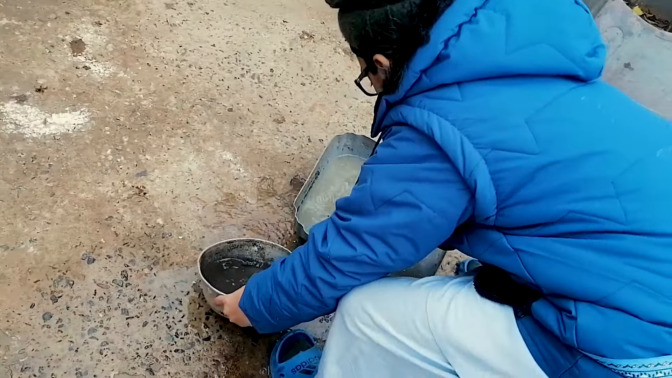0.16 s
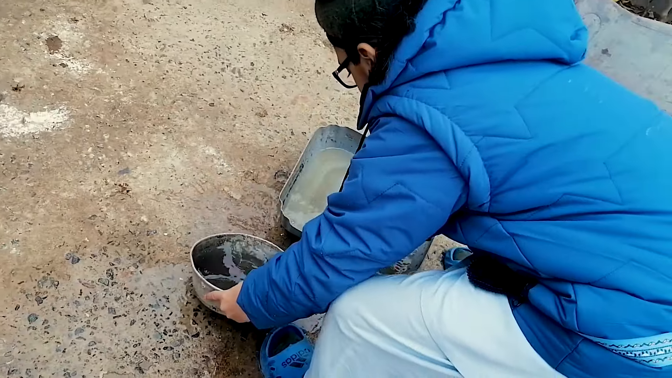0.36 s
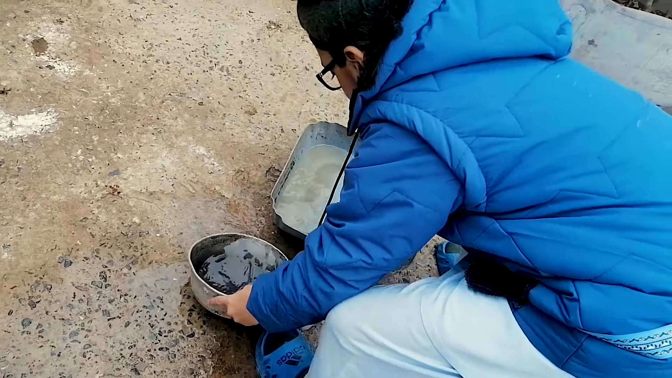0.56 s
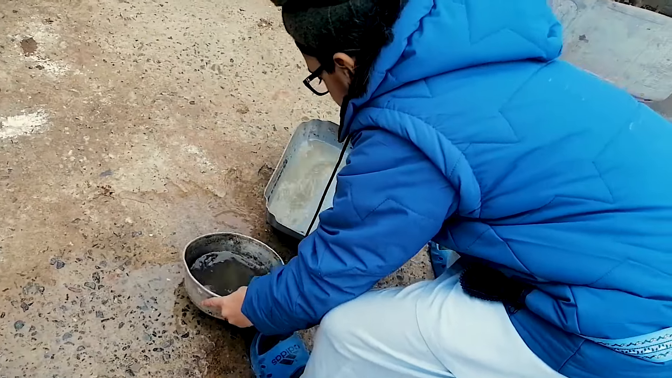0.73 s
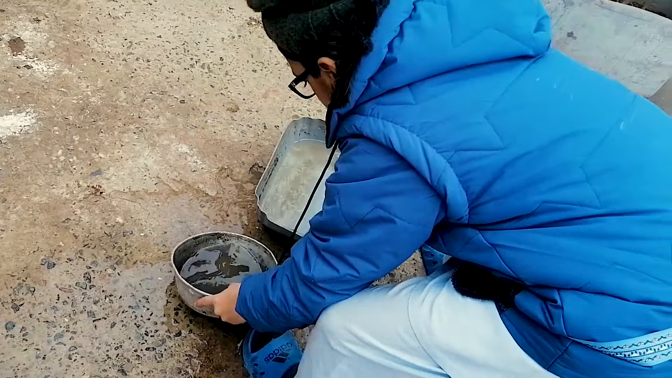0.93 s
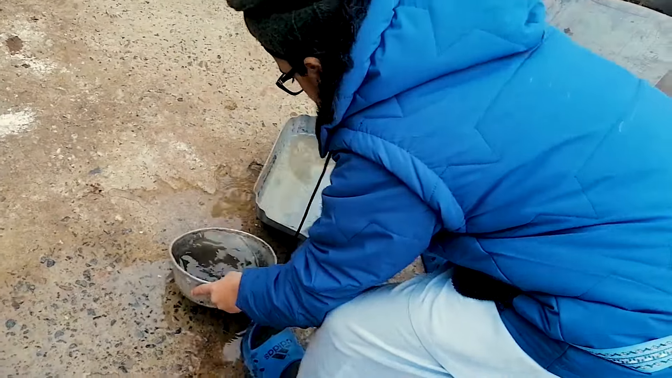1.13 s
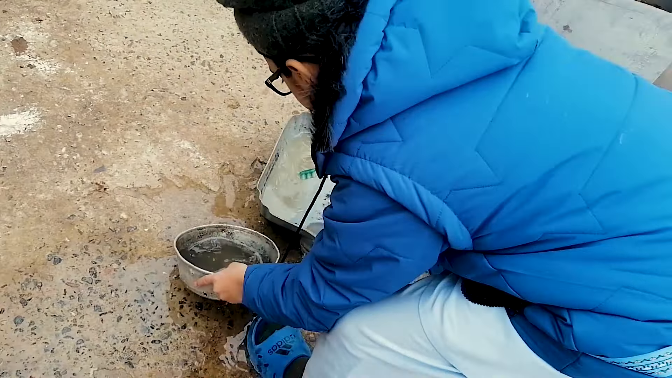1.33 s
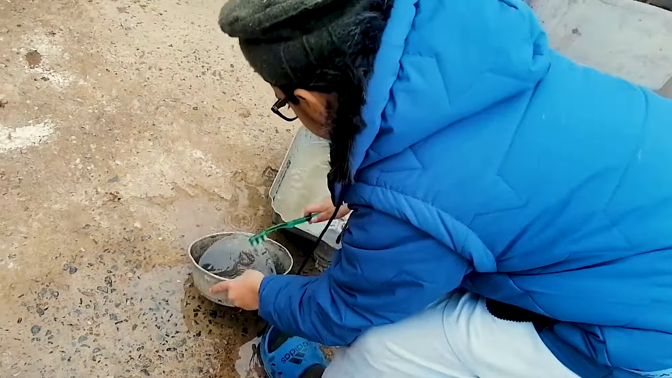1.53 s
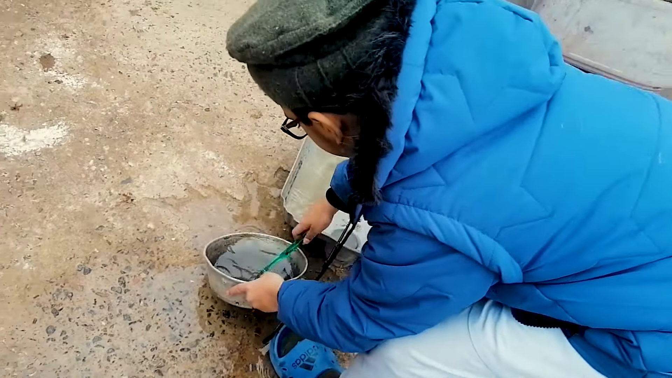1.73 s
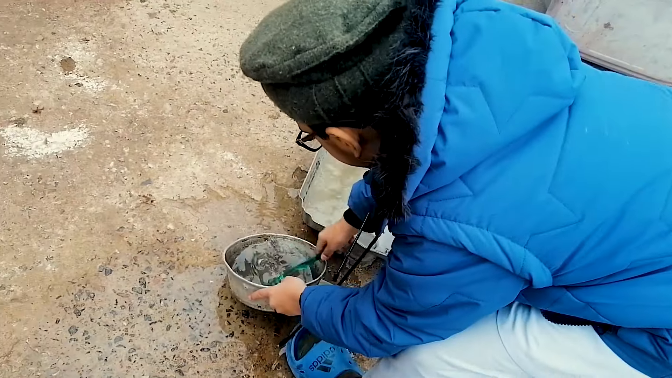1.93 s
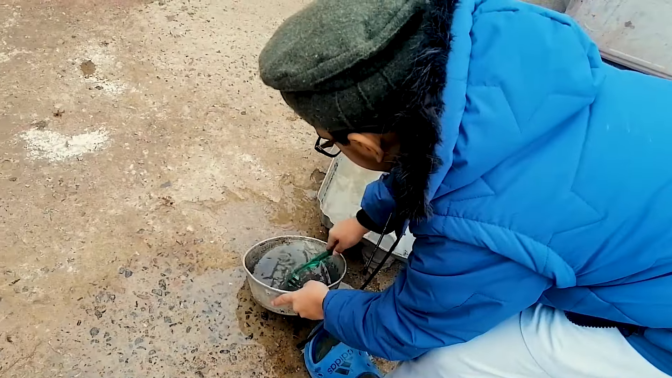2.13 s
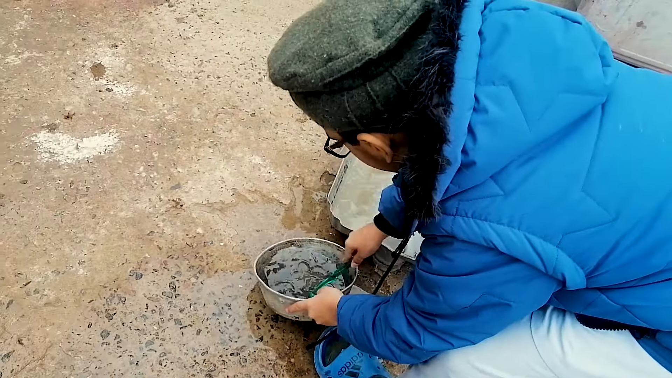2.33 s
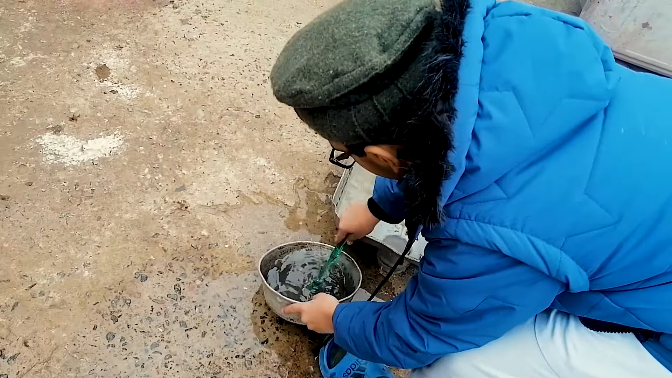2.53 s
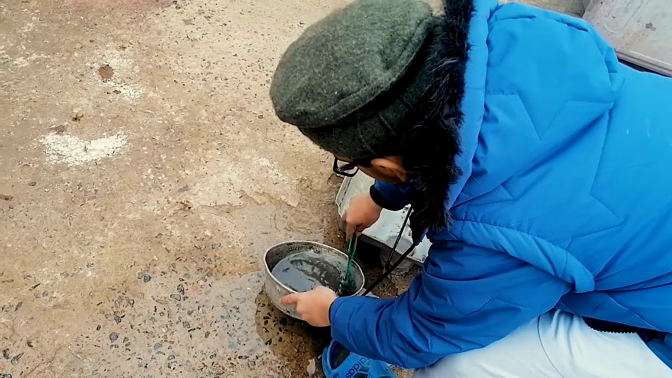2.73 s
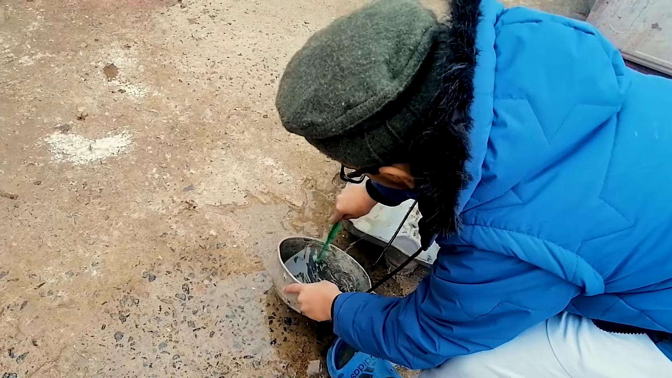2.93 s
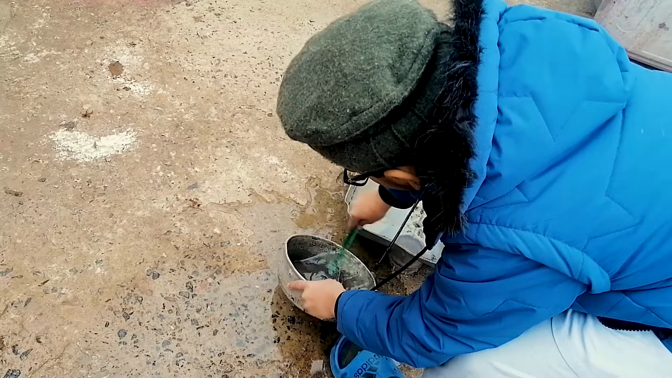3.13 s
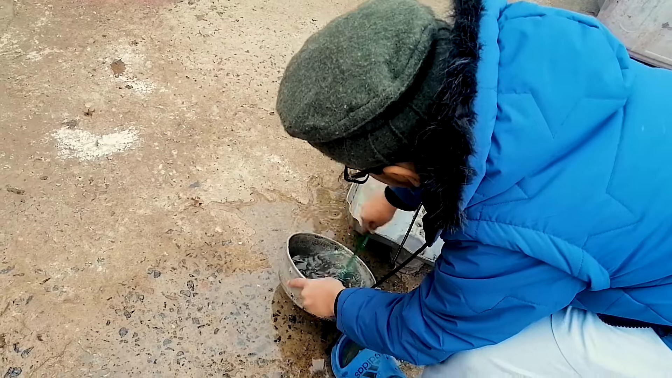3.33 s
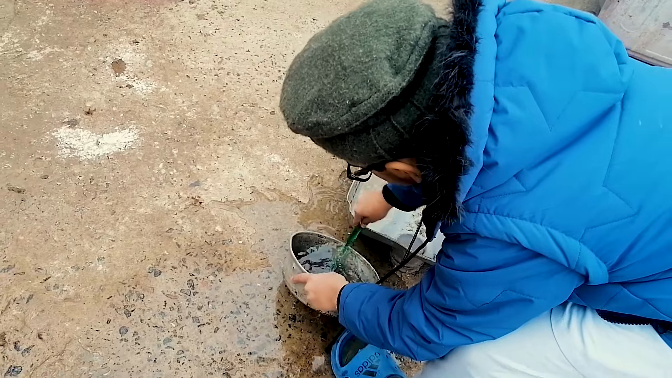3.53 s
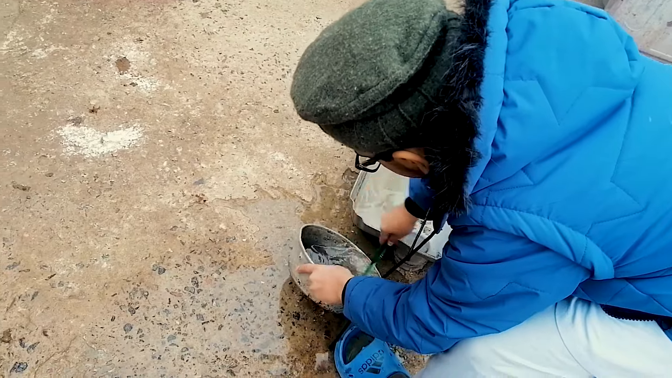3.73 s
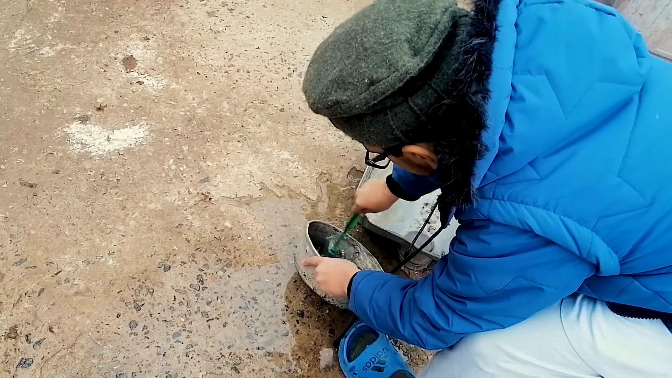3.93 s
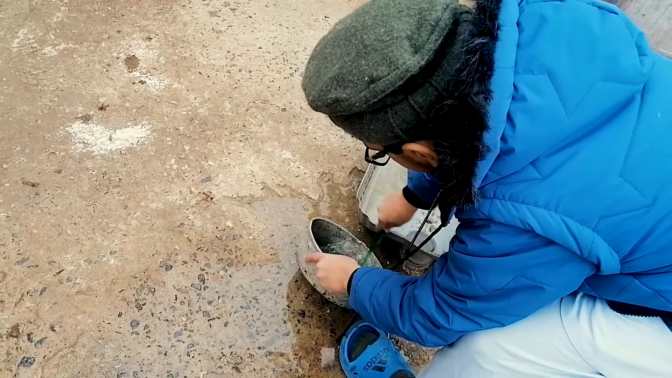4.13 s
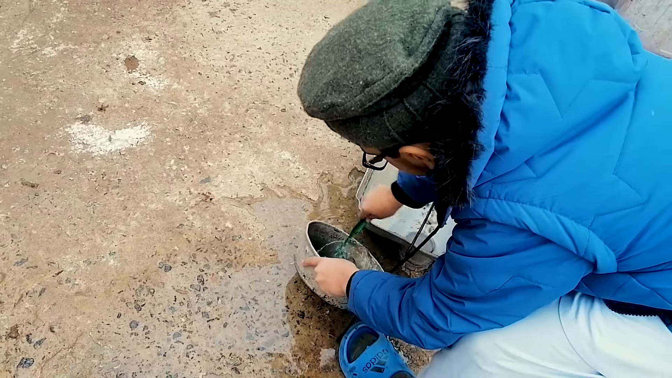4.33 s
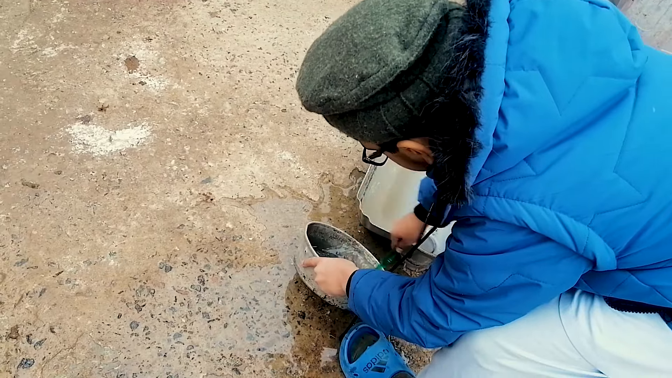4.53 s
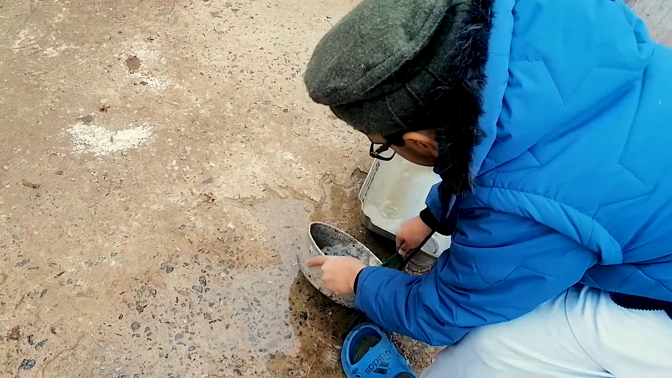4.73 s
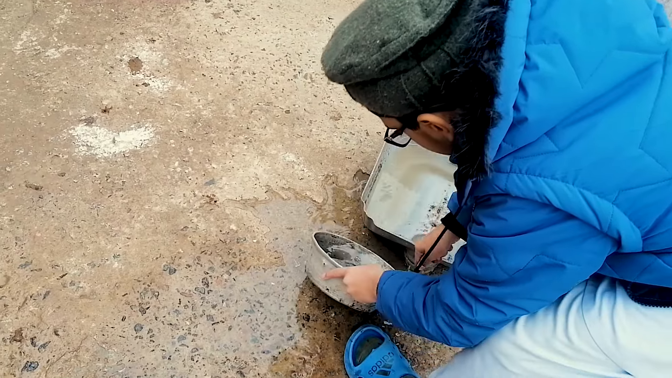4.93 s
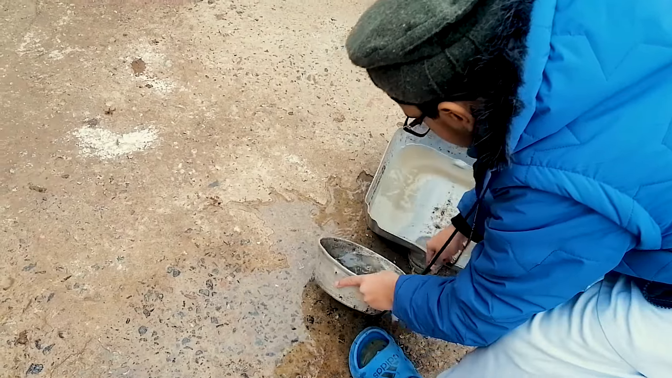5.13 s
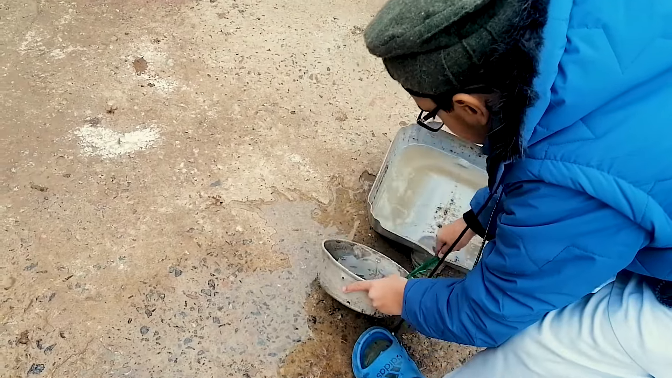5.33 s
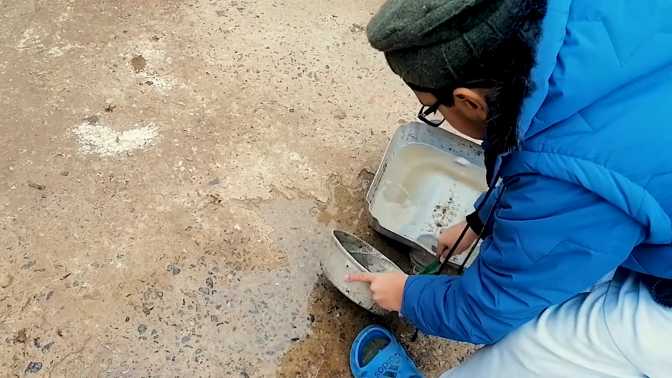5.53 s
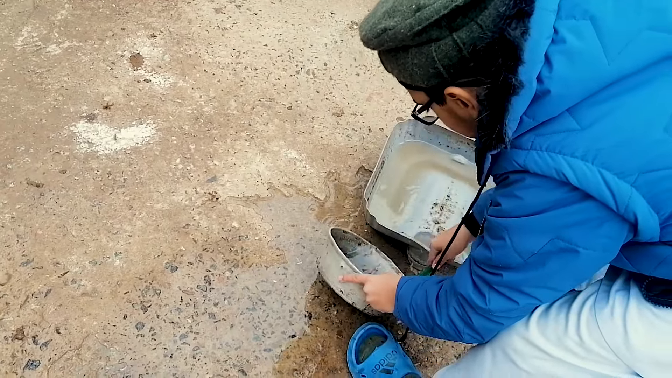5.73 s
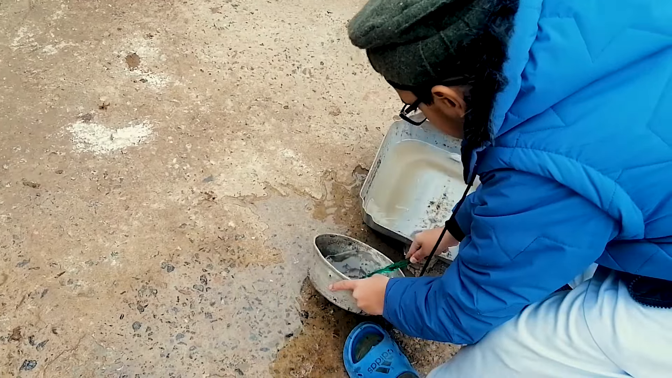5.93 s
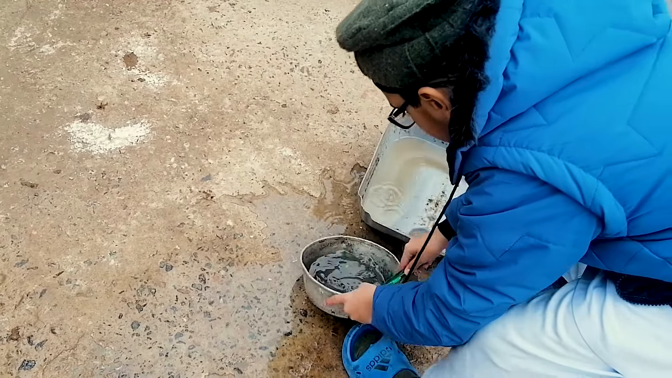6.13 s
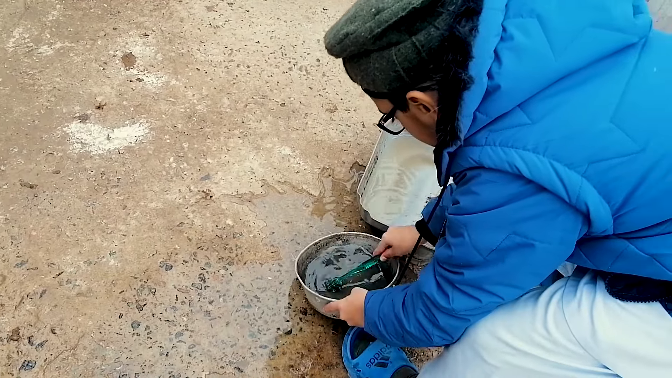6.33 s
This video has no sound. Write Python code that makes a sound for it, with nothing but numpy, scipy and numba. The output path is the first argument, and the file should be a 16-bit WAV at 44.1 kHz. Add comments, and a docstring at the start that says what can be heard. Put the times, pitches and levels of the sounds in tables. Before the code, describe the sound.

A metal bowl shifts and grinds briefly, pauses while a bird whistles, then is scrubbed with a stiff little brush. Strokes are quick, dry-edged and crisp, some hissy and thin, others ringing the damped bowl around a hollow mid pitch. Small ticks and knocks interrupt. Close, nearly dry open-air sound with quiet distant rumble, light wind thuds and faint hum.

```python
"""Scrubbing a gritty steel bowl

A small stiff brush scrubs a wet, gritty steel bowl held on concrete, heard at two microphone ports.
Strokes land, drag and lift: bristles flick over grit (shaped noise) and ring the hand-damped bowl (modes).
The brush head and the ground knock the bowl now and then, and its base grinds on the ground.
A bird chirps in gliding whistles over far rumble, thuds, hiss and hum; the right port resonates in the treble."""
import sys
import numpy as np
from scipy import signal
from scipy.fft import rfft, irfft
from scipy.io import wavfile
from scipy.ndimage import uniform_filter1d, minimum_filter1d
from numba import njit

SR = 44100
rng = np.random.default_rng(int(sys.argv[2]) if len(sys.argv) > 2 else 0)


def persist_wave(psi):
    """Save psi, clipped to +-1, as 16-bit WAV."""
    counts = np.round(np.clip(psi, -1, 1) * 32767).astype(np.int16)
    wavfile.write(sys.argv[1], SR, np.atleast_2d(counts).T)


N = 280678

# Brush strokes. Each row: start in seconds, landing in seconds, drag in seconds, swell over the drag in dB,
# then at the end of the drag bristle force, wall force and body force in dB,
# top treble in dB, favoured wall pitch in Hz, favoured body pitch in Hz.
STROKES = [ (0.0, 0.0051, 0.004, -10, -29, -33.5, -0.5, -3.5, 1660, 767),
           (.024, 0.0029, .055, -5.5, -43.5, -45.5, -22.5, -4, 1650, 864),
           (.07, 0.0042, 0.065, -2.5, -40.5, -44, -30.5, -1, 1850, 670),
           (0.15, 0.0044, 0.02, -14.5, -51.5, -48, -32.5, -14, 1390, 810),
           (.192, 0.0038, 0.0069, -8.5, -34, -49.5, -40, -45.5, 1450, 770),
           (.44, 0.064, .11, 8, -53.5, -74.5, -77, -11, 1404, 780),
           (.62, 0.0039, 0.0081, -5, -49, -63, -68.5, 10.5, 1390, 795),
           (1.574, 0.028, 0.04, -0.5, -38, -43.5, -64, 10.5, 2700, 840),
           (1.775, 0.034, 0.024, 0.5, -28.5, -29.5, -60, -10, 2296, 860),
           (1.95, 0.047, 0.025, 3.5, -48, -56, -51, 0.5, 1750, 848),
           (2.004, 0.025, 0.032, 12, -20.5, -23.5, -33, 8, 1730, 868),
           (2.06, 0.022, 0.033, -3.5, -44, -37.5, -25.5, 0, 1790, 842),
           (2.15, 0.037, 0.068, -4, -28.5, -26.5, -22.5, -2.5, 1880, 858),
           (2.318, 0.041, 0.026, 1, -27.5, -27.5, -24, -1, 1850, 922),
           (2.466, 0.015, 0.049, -10, -61.5, -54, -49.5, -2.5, 1770, 874),
           (2.62, 0.017, 0.07, 1, -61, -53, -33.5, 16, 1500, 730),
           (2.662, 0.061, 0.023, -1.5, -32.5, -34, -31.5, 7.5, 2130, 950),
           (2.79, 0.0088, 0.038, -5, -40.5, -45.5, -43, -0.5, 1920, 905),
           (2.862, 0.05, 0.032, 7.5, -5.5, -12, -30, -2, 1970, 888),
           (3.13, 0.018, 0.062, 6, -55, -60.5, -59, 9.5, 1810, 860),
           (3.239, 0.017, 0.066, 19.5, -35, -39.5, -35.5, 0, 2040, 783),
           (3.42, .04, 0.054, 5, -60.5, -83.5, -65, 12.5, 1600, 730),
           (3.534, 0.0046, 0.051, -7, -69, -78, -37.5, 3, 1450, 725),
           (3.638, 0.015, 0.013, -6.5, -42.5, -42, -46, 2, 1400, 742),
           (3.699, 0.01, 0.013, -12, -39.5, -60, -50.5, -22, 1405, 740),
           (3.82, 0.022, 0.041, 2.5, -50, -78.5, -60, 9, 1426, 760),
           (3.982, 0.019, 0.05, 4.5, -22, -22, -24, 0, 1923, 843),
           (4.212, 0.021, 0.024, 0, -24.5, -49.5, -79.5, -25, 2796, 850),
           (4.29, 0.015, 0.034, -4.5, -39, -58.5, -84.5, -6, 2900, 844),
           (4.348, 0.016, 0.041, 5.5, -22.5, -40, -98, -19.5, 2910, 835),
           (4.46, 0.0052, 0.016, -2, -40, -70.5, -82, -1, 2600, 830),
           (4.567, .035, 0.063, -1.5, -25.5, -24.5, -27, 3, 2204, 863),
           (4.929, 0.018, 0.047, 3.5, -16, -26, -27, -0.5, 2210, 743),
           (5.13, 0.043, 0.062, -0.5, -41, -53, -61.5, 2.5, 2520, 760),
           (5.247, 0.0068, 0.088, -14.5, -39.5, -62, -90, 0, 2650, 743),
           (5.384, .015, 0.058, -10, -37, -65.5, -79.5, 5, 3210, 742),
           (5.489, 0.018, 0.052, 2.5, -33, -80, -77, 5, 3200, 797),
           (5.64, 0.018, 0.022, -3, -31, -76, -76.5, 3.5, 3200, 850),
           (5.74, 0.022, 0.034, -4.5, -35.5, -71, -78, 3.5, 3160, 900),
           (5.85, 0.045, .04, -3, -31.5, -64.5, -80.5, 5, 3000, 960),
           (6.007, .003, 0.0068, -10.5, -46, -73, -73, -16, 2490, 1027),
           (6.105, 0.0059, 0.025, -12.5, -44.5, -30.5, -33.5, -1.5, 1850, 1100),
           (6.18, 0.0052, 0.088, -1, -78, -67, -39, 4, 1380, 724)]
# Knocks on the bowl. Each row: time in seconds, drive in dB of body, wall and bristle tick.
KNOCKS = [(.004, -12, -46, -44.5), (0.159, -12.5, -53, -42), (0.192, -52, -30, -24),
          (1.107, -38.5, -47, -67), (2.016, -66, -50, -20), (2.053, -34, -41.5, -11),
          (2.178, -22.5, -40.5, -42), (2.359, -28, -42, -40), (2.798, -24.5, -32.5, -45),
          (3.041, -66.5, -56.5, -15.5), (3.3, -25, -31, -18), (3.547, -36, -66, -62), (3.65, -25, -55, -48),
          (3.704, -63, -65, -15.5), (4.0, -42, -27.5, -18), (4.232, -65, -43, -29),
          (4.364, -64, -56, -32.5), (4.85, -67, -62, -48.5), (4.942, -30, -14.5, -22),
          (5.252, -65, -35, -16), (5.315, -68, -37.5, -60), (5.399, -70.5, -64.5, -29),
          (5.757, -65.5, -60, -33), (6.11, -4, -20, -19), (6.183, -15.5, -51.5, -65)]


def undb(db):
    """Amplitude ratio of a level in dB."""
    return 10 ** (np.asarray(db) / 20)


def unit(x):
    """Scale to rms 1."""
    return x / np.sqrt(np.mean(x ** 2))


def colour(x, table):
    """Shape by a (Hz, dB) spectrum, keeping the power of white input."""
    hz, db = np.transpose(table)
    bin_hz = np.fft.rfftfreq(N, 1 / SR)
    gain = undb(np.interp(np.log(bin_hz + 1), np.log(hz), db))
    return irfft(rfft(x) * unit(gain), N)


def butter(x, order, cut_hz, kind):
    """Butterworth filter."""
    return signal.sosfilt(signal.butter(order, cut_hz, kind, fs=SR, output="sos"), x)


def walk(rate_hz):
    """Random levels held for 1 / rate and slewed twice; spread near 1."""
    hold = int(SR / rate_hz)
    steps = np.repeat(rng.standard_normal(N // hold + 1), hold)
    return 1.706 * uniform_filter1d(uniform_filter1d(steps, hold), hold)[:N]


def outdoors():
    """Distant hiss, swelling rumble, wind thuds and a wavering hum; the bass is much alike at both ports."""
    # Spectrum of the hiss. Each row: frequency in Hz, relative density in dB per Hz.
    air_spectrum = [(12, -30.5), (20, -11.5), (134, -12), (248, -6.5), (472, -16), (780, -19),
                    (1530, -27.5), (3160, -28), (3740, -40.5), (5080, -38), (6010, -39), (7950, -49),
                    (14300, -50.5), (16000, -70)]
    # Bass levels. Each row: time in seconds, rumble in dB, wind thud in dB.
    bass_levels = [(0.0, -41, -59.5), (0.14, -58, -69), (0.55, -41.5, -67), (0.67, -51.5, -68),
                   (1.49, -43, -69), (1.56, -52, -68.5), (2.97, -56, -74), (3.68, -50.5, -50.5),
                   (3.72, -53, -54.5), (4.52, -62, -75), (5.24, -48.5, -60), (5.88, -59.5, -71),
                   (6.0, -39, -72), (6.04, -46.5, -57), (6.2, -60.5, -78), (6.36, -52, -68)]
    # Hum partials. Each row: frequency in Hz, level in dB.
    hum_partials = [(194, -56.5), (388, -72)]
    t = np.arange(N) / SR
    lean = np.array([[-1], [1]])  # towards the right port

    mid, side = rng.standard_normal((2, N))
    air = undb(-57) * colour(np.array([mid + 0.39 * side, mid - 0.67 * side]), air_spectrum)

    time_s, rumble_db, thud_db = np.transpose(bass_levels)
    common, *own = rng.standard_normal((3, N))
    own = np.array(own)
    rumble = unit(butter(common + 0.1 * own, 2, [62, 140], "band"))
    rumble = rumble * undb(np.interp(t, time_s, rumble_db))
    thud = unit(butter(common + 0.35 * own, 2, [22, 52], "band"))
    thud = thud * undb(np.interp(t, time_s, thud_db))

    phase_per_hz = 2 * np.pi * np.cumsum(1 + 0.0041 * walk(4.5)) / SR
    hum = sum(undb(db + 1.0 * walk(3)) * np.sin(hz * phase_per_hz) for hz, db in hum_partials)
    return air + undb(1.8 * lean) * rumble + thud + undb(1.2 * lean) * hum


def bird():
    """Gliding whistles; roughness pulls the pitch down in quick dips and smears each line into a band below it."""
    # Chirps. Each row: start in seconds, rise in seconds, fall in seconds, first pitch in Hz,
    # pitch when loudest in Hz, last pitch in Hz, level in dB, roughness 0-2.
    chirps = [(.69, 0.05, .17, 2820, 2600, 2000, -55, .2),
              (0.942, 0.069, 0.089, 3500, 4810, 4330, -37.5, 0.67),
              (.93, 0.036, 0.024, 6400, 7200, 6870, -53, 0.25),
              (0.938, 0.081, 0.099, 1965, 1800, 1720, -47.5, 0.41),
              (1.324, 0.017, .085, 3550, 3726, 3404, -43.5, 0.633),
              (1.73, 0.027, 0.024, 6300, 5200, 5270, -45.5, 0.25)]
    fade_in_db, fade_out_db = 22.5, 19
    dip_share = 0.22  # of the pitch, at roughness 1
    fray = 2.3  # roughness grows by this share towards the end
    out, t = np.zeros(N), np.arange(N) / SR
    for start, rise, fall, first_hz, loud_hz, last_hz, db, rough in chirps:
        loudest, end = start + rise, start + rise + fall
        rising = np.interp(t, [start, loudest], [1, 0])
        fading = np.interp(t, [loudest, end], [0, 1])
        dip = dip_share * rough * (1 + fray * fading) * np.tanh(0.6 * walk(700) ** 2)
        glide_hz = np.interp(t, [start, loudest, end], [first_hz, loud_hz, last_hz])
        pitch_hz = uniform_filter1d(glide_hz, int((rise + fall) * SR / 4)) * (1 - dip)
        shape_db = -fade_in_db * rising ** 1.37 - fade_out_db * fading ** 1.6
        level = undb(db + shape_db + 3.1 * walk(150))
        sounding = (t > start) & (t < end)
        out += sounding * level * np.sin(2 * np.pi * np.cumsum(pitch_hz) / SR)
    return out * undb(np.array([[-3.0], [1.5]]))


def grit(spread_db, patchy_db, rate_hz):
    """Dense clicks, a few much larger, over patches of rougher and smoother rust."""
    size = undb(spread_db * rng.exponential(size=N) + patchy_db * walk(rate_hz))
    return unit(size * rng.standard_normal(N))


def contact(rows, level_db, lift_db_per_s):
    """One shape for every contact: it lands, drags while swelling or sagging, and lifts."""
    landing_db = 27.5  # a contact starts this far under the level at which its drag begins
    t, gain = np.arange(N) / SR, np.zeros(N)
    for (start, landing, drag, swell_db), db in zip(np.array(rows)[:, :4], level_db):
        since = t - start
        corners_s = [0, landing, landing + drag]
        shape_db = np.interp(since, corners_s, [-swell_db - landing_db, -swell_db, 0], -150)
        lift_db = lift_db_per_s * np.maximum(since - landing - drag, 0)
        gain = np.maximum(gain, undb(db + shape_db - lift_db))
    return uniform_filter1d(gain, int(0.0033 * SR))


def blows(level_db, push_s, sharp, ragged):
    """Knocks as forces: a sharp impact and a ragged, decaying push after it."""
    impact = np.zeros(N)
    impact[(np.array(KNOCKS)[:, 0] * SR).astype(int)] = undb(level_db)
    t = np.arange(SR // 10) / SR
    push = signal.fftconvolve(impact, np.exp(-t / push_s))[:N]
    return sharp * impact + ragged * push * rng.standard_normal(N)


@njit
def resonate(force, hz, decay):
    """One mode whose pitch may move; returns the rotating state."""
    z, out = 0j, np.empty(len(force), np.complex128)
    for i in range(len(force)):
        if i % 32 == 0:
            pole = decay * np.exp(2j * np.pi * hz[i] / SR)
        z = z * pole + force[i]
        out[i] = z
    return out


def ring(force, modes, favour_db, spot_db, drift, turn_rad, lo_hz, hi_hz):
    """Modes share a force's power: contact favours some, water and grip bend them, port phase wanders."""
    out, power = 0, 0
    for hz, db, t60_s in modes:
        decay = np.exp(-np.log(1000) / (t60_s * SR))
        gain = undb(db + favour_db(hz) + spot_db * walk(9))
        z = resonate(force * gain + 1e-18, hz * (1 + drift * walk(14)), decay)
        half_turn = np.exp(0.5j * turn_rad * walk(12))
        out = out + np.array([(z * half_turn).imag, (z / half_turn).imag])
        power += gain ** 2 / (1 - decay ** 2) / 2
    # keep each family of modes within its own pitch band
    return butter(out / np.sqrt(power), 6, [lo_hz, hi_hz], "band")


def per_stroke(values):
    """Hold each stroke's value until the next stroke starts."""
    start_s = np.array(STROKES)[:, 0]
    stroke = np.searchsorted(start_s, np.arange(N) / SR, "right") - 1
    return values[np.clip(stroke, 0, None)]


def ground_base():
    """The base of the bowl rings only when it grinds on the ground."""
    # Base modes. Each row: frequency in Hz, relative level in dB, t60 in seconds.
    base_modes = [(363, -10.5, 0.074), (472, -3, .1), (543, 4.5, 0.059)]
    # Grinds. Each row: start in seconds, landing in seconds, drag in seconds, swell in dB, force in dB.
    grinds = [(0.0, .08, 0.058, 0, -38), (3.54, 0.015, 0.042, -5, -41), (4.88, 0.035, 0.034, 2, -50.5)]
    force = contact(grinds, np.array(grinds)[:, -1], lift_db_per_s=394) * grit(1.8, 1.9, 40)
    return ring(force, base_modes, lambda hz: 0, 5.4, 0.011, 0.8, 230, 620)


def bowl_body():
    """Strokes and knocks ring the low modes, damped by hand and water; each stroke favours a pitch."""
    # Body modes. Each row: frequency in Hz, relative level in dB, t60 in seconds.
    body_modes = [(625, 4, 0.12), (771.3, 6.5, 0.064), (881.7, 1, 0.087), (967, -0.5, 0.17),
                  (1128, -3.5, 0.023)]
    *_, body_db, _, _, body_hz = np.transpose(STROKES)
    favoured_hz = uniform_filter1d(per_stroke(body_hz), SR // 50)
    force = contact(STROKES, body_db, lift_db_per_s=381.5) * grit(0.42, 1.8, 60)
    force += blows(np.array(KNOCKS)[:, 1], 0.0013, sharp=11.0, ragged=0.3)

    def favour_db(hz):
        return -14 * np.tanh(np.log2(hz / favoured_hz) ** 2 / 0.05)
    return ring(force, body_modes, favour_db, 1.5, 0.02, 0.4, 674.5, 1350)


def bowl_wall():
    """Strokes and knocks ring the higher, damped modes of the wall; each stroke favours a pitch."""
    # Wall modes. Each row: frequency in Hz, relative level in dB, t60 in seconds.
    wall_modes = [(1245, -12.5, 0.056), (1356.4, 9, 0.055), (1450, 2.5, 0.026), (1613, -7, 0.13),
                  (1675, -7, 0.11), (1800, -3.5, 0.061), (1979, -3, 0.042), (2251, -4, 0.041),
                  (2404, 3.5, 0.03), (2609, 1.5, 0.068), (2710, 1, 0.018), (2900, 7, 0.017),
                  (3268, 11, 0.027), (3340, 4, 0.058)]
    *_, wall_db, _, _, wall_hz, _ = np.transpose(STROKES)
    favoured_hz = uniform_filter1d(per_stroke(wall_hz), SR // 50)
    force = contact(STROKES, wall_db, lift_db_per_s=398.5) * grit(3.0, 0.89, 60)
    force += blows(np.array(KNOCKS)[:, 2], 0.0022, sharp=2.7, ragged=0.93)

    def favour_db(hz):
        return -26 * np.tanh(np.log2(hz / favoured_hz) ** 2 / 0.6)
    return ring(force, wall_modes, favour_db, 2.5, 0.03, 1.0, 1300, 4200)


def bristle_flicks():
    """Force of bristles flicking over grit, with the ticks of the knocks."""
    hiss_db = np.array(STROKES)[:, 4]
    force = contact(STROKES, hiss_db, lift_db_per_s=401) * grit(2.2, 3.0, 120)
    return force + blows(np.array(KNOCKS)[:, 3], 0.0013, sharp=2.4, ragged=0.48)


def steel_sheen(flicks):
    """Dense treble modes of the steel, which come and go."""
    modes = [(hz, 0, 0.014) for hz in np.geomspace(4600, 6400, num=8)]
    return undb(-16.5) * ring(flicks, modes, lambda hz: 0, 8.0, 0.016, 2.87, 4000, 8200)


def bristle_hiss(flicks):
    """Flicks as shaped noise, part common to the ports; each stroke has its own treble brightness, which flickers."""
    # Hiss spectrum. Each row: frequency in Hz, relative density in dB per Hz.
    bristle_spectrum = [(1500, -40.5), (2600, -17.5), (4000, -1.5), (5500, 9), (7000, -3.5), (9000, -4),
                        (12000, -5.5), (16000, -11.5)]
    own = rng.standard_normal((2, N))
    hiss = colour(0.11 * flicks + 0.24 * np.abs(flicks) * own, bristle_spectrum)
    split_hz = 8600
    top = butter(hiss, 3, split_hz, "high")
    top_db = per_stroke(np.array(STROKES)[:, 7]) + 2.0 * walk(110)
    return butter(hiss, 3, split_hz, "low") + top * undb(top_db)


def scrub():
    """Strokes and knocks drive bristle hiss and bowl modes; wall and body lean to the left port."""
    lean = np.array([[1], [-1]])
    flicks = bristle_flicks()
    wall = undb(1.24 * lean) * bowl_wall()
    body = undb(0.7 * lean) * bowl_body()
    return bristle_hiss(flicks) + steel_sheen(flicks) + wall + body + ground_base()


def scatter(near):
    """Ground, body and walls nearby scatter a short tail: decaying noise, separate at each port."""
    t = np.arange(SR // 3) / SR
    tail = rng.standard_normal((2, len(t))) * undb(-60 * t / 0.13) * (t > 0.004)
    return undb(-33.0) * signal.fftconvolve(near, tail, axes=1)[:, :N]


def scene():
    """Scrubbing and bird, their scattered tail, and the outdoor background."""
    near = scrub() + bird()
    return near + scatter(near) + outdoors()


def record(dry):
    """Right port adds treble resonance and lift; left is a sample later; a limiter holds peaks, the top is cut."""
    port_hz, port_width_hz, port_db = 6044, 1685, 17
    b, a = signal.iirpeak(port_hz, port_hz / port_width_hz, fs=SR)
    resonance = undb(port_db) * signal.lfilter(b, a, dry[1])
    right = dry[1] + resonance + 0.47 * butter(dry[1], 1, 9000, "high")
    both = np.array([np.roll(dry[0], 1), right])
    limit = np.minimum(1, 0.9 / (np.abs(both).max(axis=0) + 1e-9))
    both = both * uniform_filter1d(minimum_filter1d(limit, size=257), size=129)
    top_hz = 15900
    return signal.sosfilt(signal.ellip(12, 0.2, 100, top_hz, fs=SR, output="sos"), both)


dry = scene()
out = record(dry)
persist_wave(out)
```